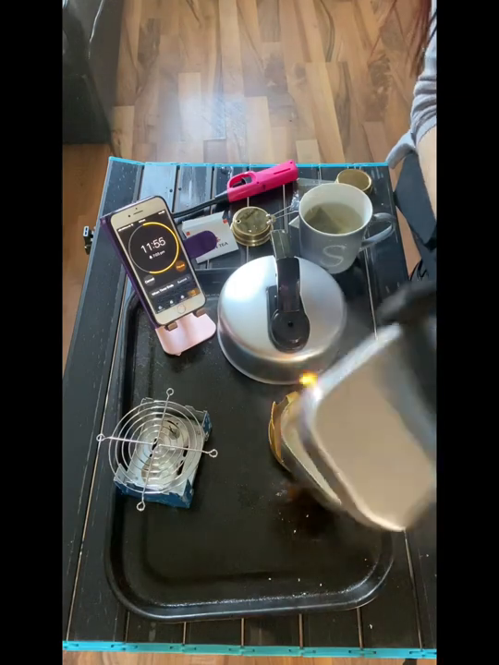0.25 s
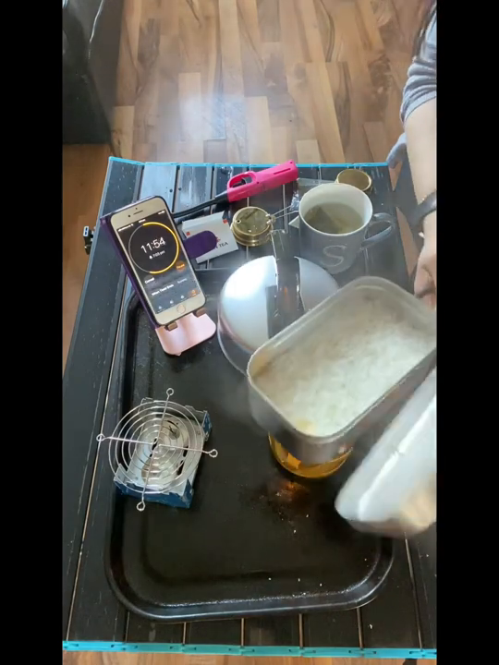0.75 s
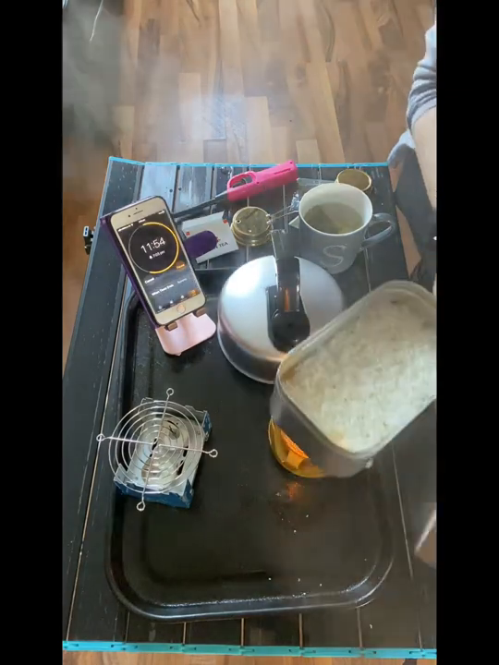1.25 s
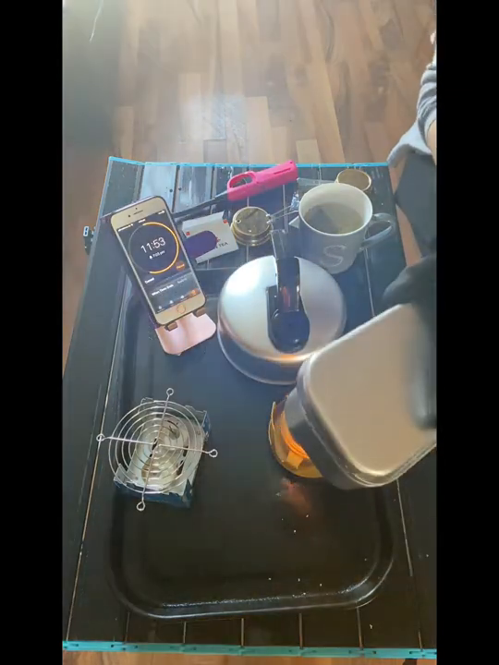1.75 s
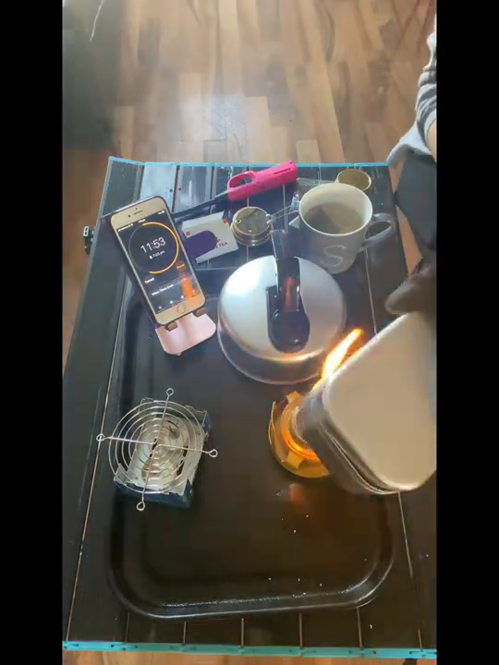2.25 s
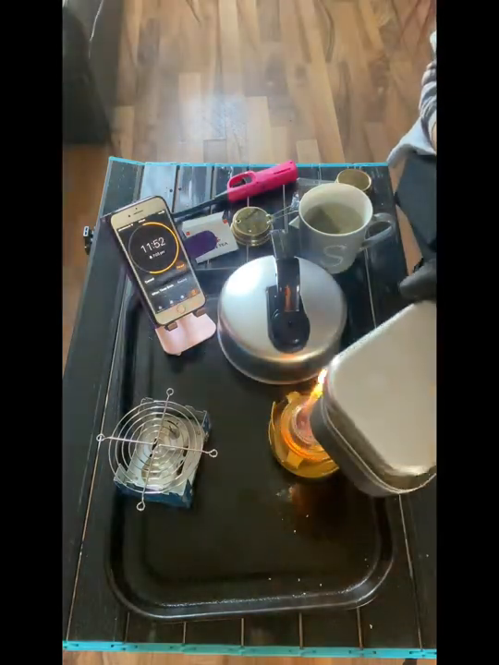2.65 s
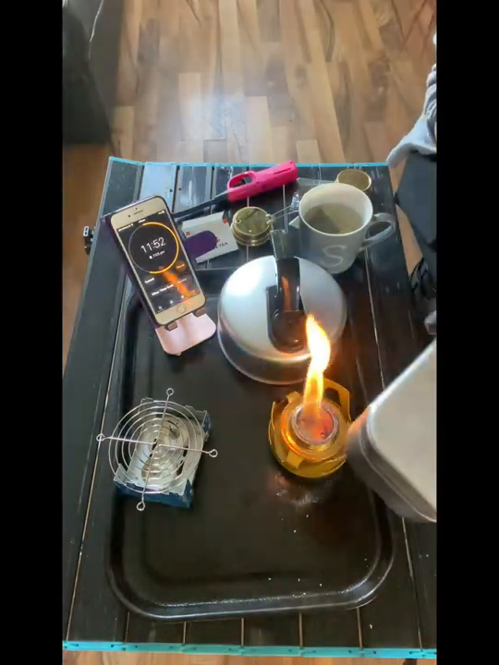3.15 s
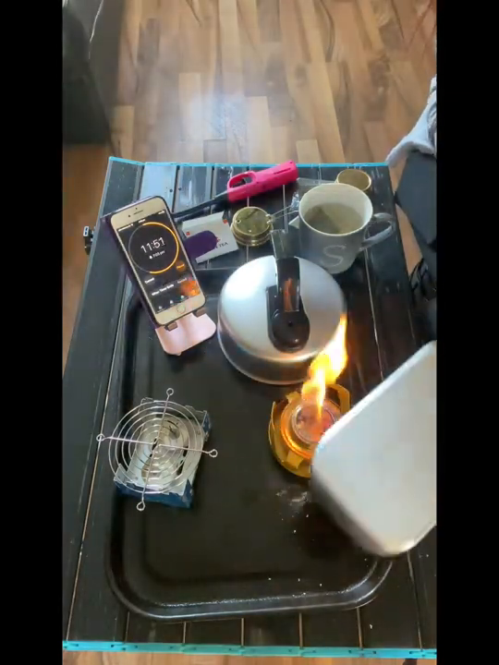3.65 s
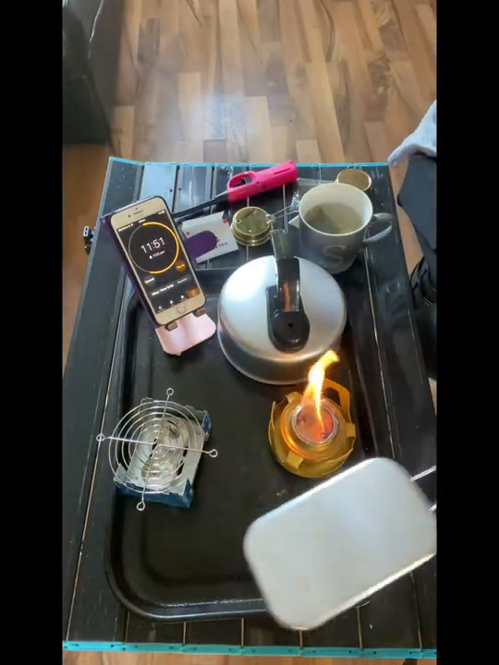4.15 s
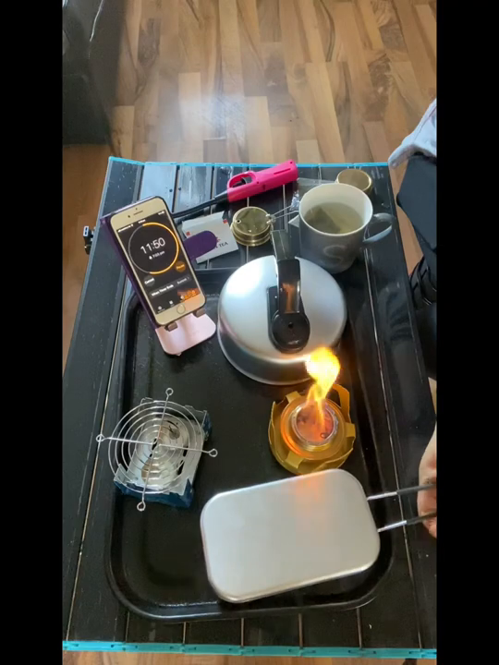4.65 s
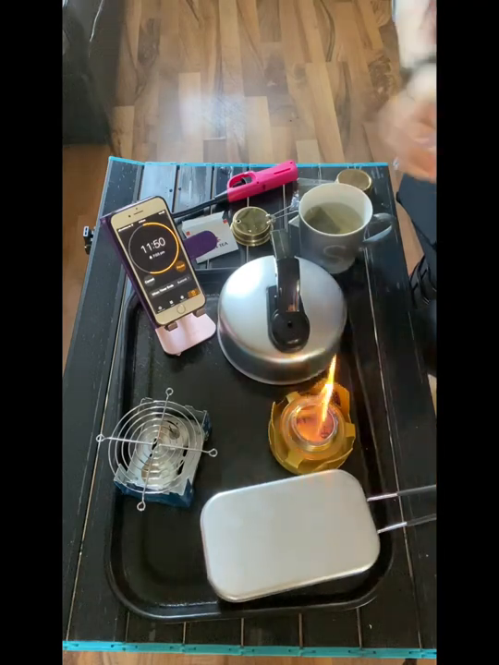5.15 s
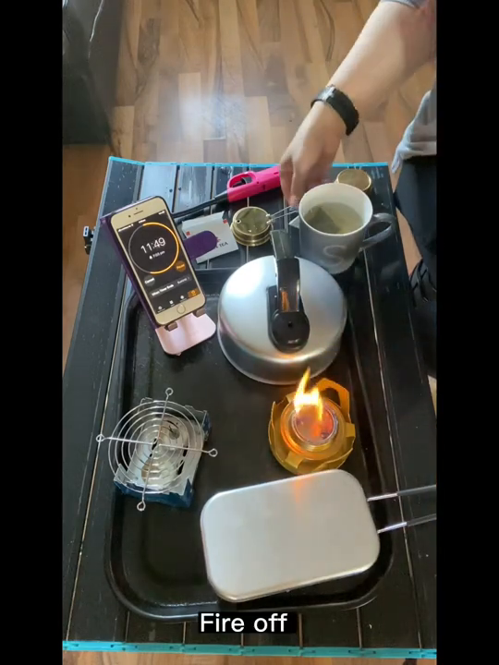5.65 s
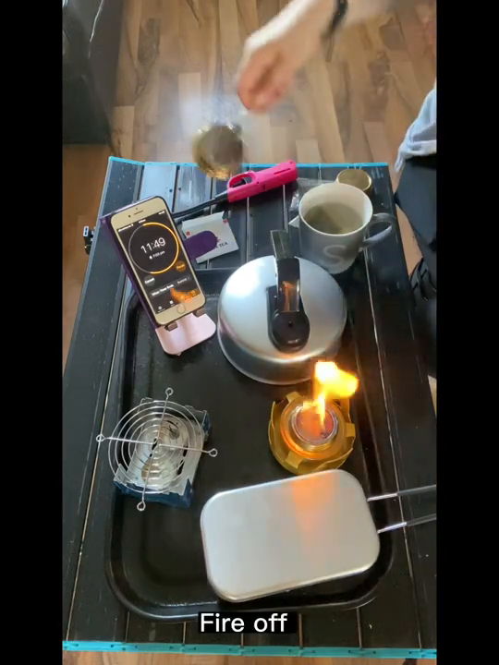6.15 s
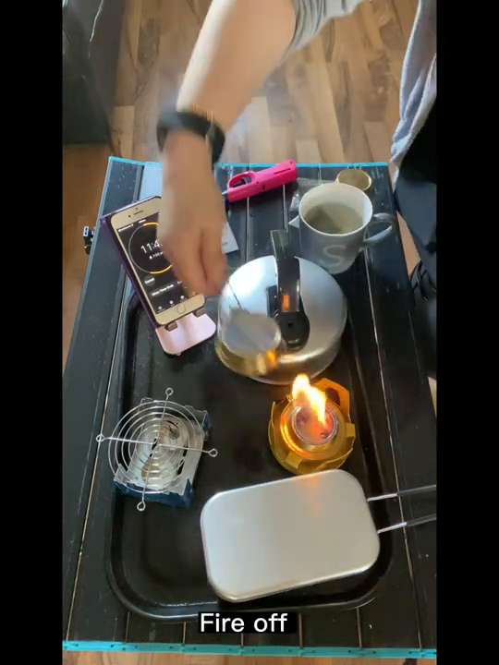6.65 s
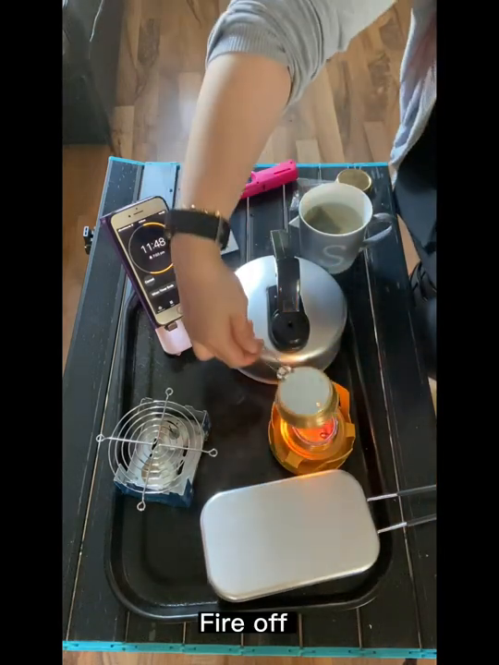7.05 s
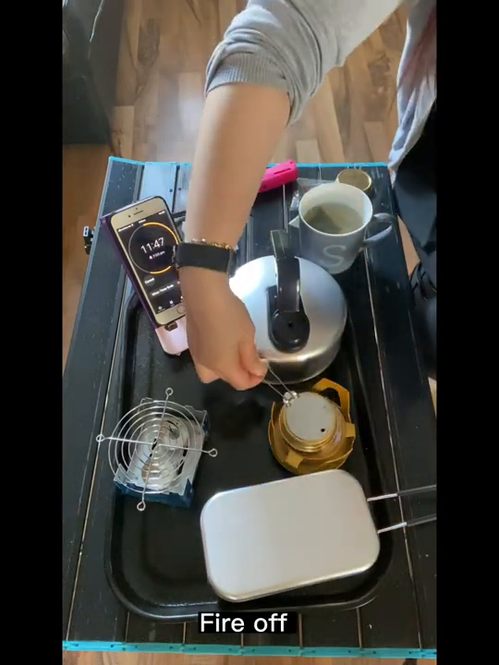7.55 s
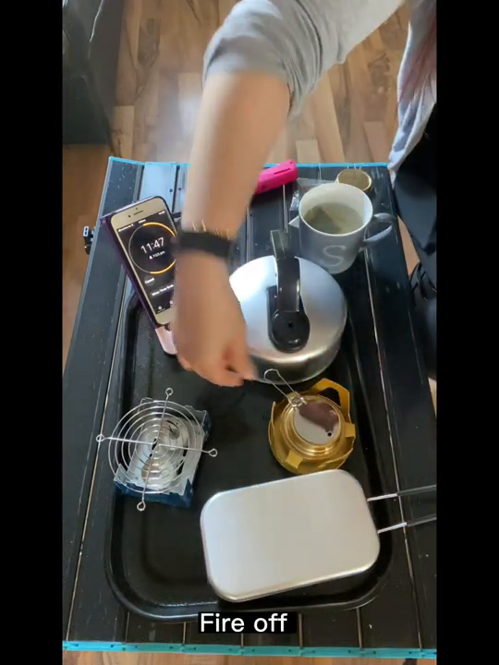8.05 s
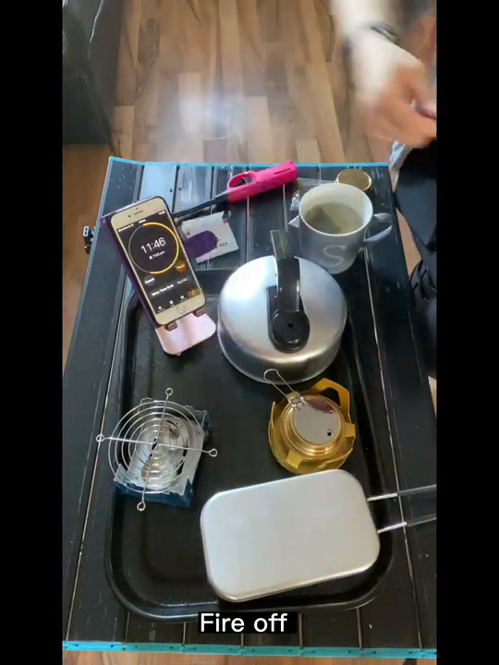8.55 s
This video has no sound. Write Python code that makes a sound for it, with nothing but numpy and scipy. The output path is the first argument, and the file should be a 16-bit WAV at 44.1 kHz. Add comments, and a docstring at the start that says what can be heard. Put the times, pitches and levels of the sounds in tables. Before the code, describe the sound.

A close recording in a small, quiet room with short reflections and faint low room tone. At 0 s a thin lid clicks against a tin over soft, fine simmering and a fading sizzle; a light handle tick follows at 0.2. Around 1.05 a drip flares into a bright hiss and fades. From 1.5 to 2.2 the lid scrapes and catches gently along the rim. At 2.5 it clacks, at 2.75 it snaps sharply, and at 2.95 it gives a last knock. The simmer weakens. The filled tin knocks a steel tray at 4.0, drags briefly, bangs at 4.4 and lands hardest at 4.6, with a thin high wire ring and faint rocking taps to 4.9. Bubbling dies quickly, leaving near-quiet with a tiny tick at 5.9. From 7.5 to 7.95 a small metal cap rattles, scrapes and knocks into place; a short vapour hiss at 8.05 fades to room tone.

```python
"""Mess tin over a spirit burner

An aluminium mess tin is handled in a small, quiet room: drips sizzle as the lid is lifted, the lid scrapes
and snaps back on, the tin knocks down on a steel tray, then a small metal snuffer cap is rattled into place.
Metal contacts are runs of tiny impacts exciting the modes of a body, heard with the room's reflections.
Boiling is a spectrally shaped stream of random pops; the wire handle is a set of decaying sines.
"""
import sys
import numpy as np
from scipy import signal
from scipy.fft import rfft, irfft
from scipy.io import wavfile
from scipy.ndimage import uniform_filter1d

SR = 44100
rng = np.random.default_rng(int(sys.argv[2]) if len(sys.argv) > 2 else 0)


def dump_mix(stems):
    """Bounce the given channels to the path in sys.argv[1] as a 16-bit WAV at rate SR."""
    frames = np.atleast_2d(stems).T  # one column per channel
    limited = np.clip(frames, -1, 1)  # hard clip at full scale
    pcm = np.round(limited * 32767).astype(np.int16)
    wavfile.write(sys.argv[1], SR, pcm)


N = 388080
SIZE = 16384  # samples in the response to one contact
HZ = np.fft.rfftfreq(SIZE, 1 / SR)


def gain_of(db):
    """Decibel law: a level in dB becomes an amplitude ratio."""
    return 10 ** (np.asarray(db) / 20)


def evened(x):
    """Normalization: scales to an rms of one."""
    return x / np.sqrt(np.mean(abs(x) ** 2) + 1e-30)


def read(points, hz):
    """Interpolation of a table along a logarithmic frequency axis."""
    table_hz, value = np.transpose(points)
    return np.interp(np.log(hz + 1), np.log(table_hz + 1), value)


def add(mix, start_s, sound):
    """Superposition: sums a sound into the mix from its start time."""
    part = mix[max(round(start_s * SR), 0):][:len(sound)]
    part += sound[:len(part)]


def coloured(noise, spectrum):
    """Spectral shaping: noise takes on a spectrum, at an rms of one."""
    shape = gain_of(read(spectrum, np.fft.rfftfreq(N, 1 / SR)))
    return evened(irfft(rfft(noise) * shape, N))


# Reverberation time of the room: frequency_hz, t60_s
ROOM_T60 = [(100, .5), (300, .36), (800, .28), (2000, .32), (5000, .33), (9000, .31), (15000, .3)]


def room(x, wet_db, delay_s=0.0032, build_s=0.0041):
    """Reverberation: reflections build up after a short delay and decay at a rate set by frequency."""
    hz, t, tail_bands = signal.stft(rng.choice([-1., 1.], SIZE), SR, nperseg=256)
    decay = gain_of(-60 * t / read(ROOM_T60, hz)[:, None])
    tail = signal.istft(tail_bands * decay, SR, nperseg=256)[1]
    tail *= np.clip((np.arange(len(tail)) / SR - delay_s) / build_s, 0, 1)
    tail /= np.linalg.norm(tail)
    return x + gain_of(wet_db) * signal.oaconvolve(x, tail)[:N]


# Spectrum of the quiet room, relative: frequency_hz, density_db
ROOM_TONE = [(15, -63), (25, -30.5), (59, -8.5), (92, -0.5), (130, -8), (293, -6), (416, -9.5), (489, -8),
             (796, -10), (1020, -11), (1840, -18.5), (2160, -20.5), (5730, -24), (6210, -26), (16000, -38)]
ROOM_TONE_DB = -64


def room_tone():
    """Stationary random noise: the room's steady background has a fixed spectrum and level."""
    return gain_of(ROOM_TONE_DB) * coloured(rng.standard_normal(N), ROOM_TONE)


def boiling(spectrum, level_db, bubbles_per_s, spread_db):
    """Random point process: bubbles burst at random instants, a few large enough to tick."""
    sizes = gain_of(spread_db * np.minimum(rng.exponential(1, N), 5))
    bursting = rng.random(N) < bubbles_per_s / SR
    pops = rng.standard_normal(N) * sizes * bursting
    return coloured(pops, spectrum) * gain_of(level_db)


def burst_level(rows):
    """Exponential growth and decay: the level in dB is the highest of straight rises and falls."""
    t = np.arange(N) / SR
    levels_db = [peak_db - rise * np.maximum(peak_s - t, 0) - fall * np.maximum(t - peak_s, 0)
                 for peak_s, peak_db, rise, fall in rows]
    return np.max(levels_db, axis=0)


# Spectrum of the simmer, relative: frequency_hz, density_db
SIMMER = [(25, -34.5), (100, -12.5), (300, -1), (900, 8.5), (2000, 0.5), (4000, 1.5), (7000, -3.5),
          (11000, -5.5), (13000, -7), (16000, -9.5)]
SIMMER_DB, OFF_FLAME_S, ON_TRAY_S = -62.5, 2.4, 4.6
COOL_DB_PER_S, QUIET_DB_PER_S = 3.5, 15.5  # the second rate adds to the first


def simmer():
    """Boiling noise with cooling: steady over the flame, falling off it, falling faster on the tray."""
    t = np.arange(N) / SR
    cooling_db = COOL_DB_PER_S * np.maximum(t - OFF_FLAME_S, 0)
    quieting_db = QUIET_DB_PER_S * np.maximum(t - ON_TRAY_S, 0)
    return boiling(SIMMER, SIMMER_DB - cooling_db - quieting_db, bubbles_per_s=7800, spread_db=2.5)


# Spectrum of the sizzle, relative: frequency_hz, density_db
SIZZLE = [(500, -31.5), (2800, -17.5), (3700, -14.5), (5000, -19.5), (7000, -5), (7750, 5.5), (8600, -10),
          (9500, -1.5), (11500, -11), (14500, -12.5), (16000, -16.5)]
# Drips of water on the burner: peak_s, level_db, rise_db_per_s, fall_db_per_s
DRIPS = [(0, -64, 40, 45), (1.05, -58, 45, 27), (1.8, -73, 6, 15)]


def sizzle():
    """Flash boiling: each drip swells to a peak of hissing pops and dies away."""
    return boiling(SIZZLE, burst_level(DRIPS), bubbles_per_s=7400, spread_db=2.0)


# Lifts of the lid that lengthen its echo path: centre_s, half_length_s, extra_delay_ms
LID_LIFTS = [(0, 0.32, 0.45), (1.022, 0.38, 0.14), (3.256, 0.34, .25)]
LID_REST_MS = .38


def off_the_lid(hiss, echo_db):
    """Comb-filter interference: the hiss arrives directly and again off the moving lid in the hand."""
    t = np.arange(N) / SR
    delay_ms = LID_REST_MS + sum(extra_ms * np.exp(-((t - centre_s) / half_s) ** 2)
                                 for centre_s, half_s, extra_ms in LID_LIFTS)
    return hiss + gain_of(echo_db) * np.interp(t - delay_ms / 1000, t, hiss)


# Spectrum of the escaping vapour, relative: frequency_hz, density_db
SNUFF_HISS = [(1180, -40), (2000, -15), (2130, -30), (2930, 2), (3680, -10), (5760, -8), (6250, -3),
              (7120, -18), (7790, -1), (8520, -17), (14000, -17)]
# Vapour escaping under the cap: peak_s, level_db, rise_db_per_s, fall_db_per_s
SNUFFS = [(8.06, -66, 60, 22)]


def vapour():
    """Boiling noise under the cap: a dense hiss rises abruptly and decays."""
    return boiling(SNUFF_HISS, burst_level(SNUFFS), bubbles_per_s=11000, spread_db=2.0)


def causal(gain):
    """Minimum phase: the Hilbert transform of the log gain makes all ringing follow the blow."""
    log_gain = np.log(np.maximum(gain, 1e-5))
    circle = np.concatenate([log_gain, log_gain[-2:0:-1]])
    phase = -signal.hilbert(circle).imag[:len(gain)]
    return gain * np.exp(1j * phase)


def chatter(rub_s, t60_s, grit_db, bite_s):
    """Broadband excitation: tiny impacts bite in, last while metal rubs, then die, driving modes evenly."""
    t = np.arange(SIZE // 2) / SR
    envelope = (1 - np.exp(-t / bite_s)) * gain_of(-60 * np.maximum(t - rub_s, 0) / t60_s)
    impacts, catches = rng.standard_normal((2, len(t)))
    grit = gain_of(grit_db * evened(uniform_filter1d(catches, size=60)))
    force = impacts * envelope * grit
    # alternately flatten the spectrum and restore the decay
    for _ in range(3):
        spectrum = rfft(force)
        force = irfft(spectrum / (abs(spectrum) + 1e-12)) * np.sqrt(envelope)
    return evened(rfft(force, SIZE)) * np.linalg.norm(envelope)


def minor_modes(depth_db, from_hz=1800):
    """Modal density: thin sheet has many small peaks and gaps, deepest in the treble."""
    ripple = np.convolve(rng.standard_normal(len(HZ)), signal.windows.hann(61), "same")
    return gain_of(depth_db * np.clip(evened(ripple), -2, 2) * HZ / (HZ + from_hz))


def contacts(rows, body, modes, favour_db, favour_octaves, minor_db, spot_db, grit_db, bite_s,
             bass_hz=450, treble_hz=3000):
    """Modal excitation: weight adds bass, a hard edge treble, and the spot struck favours some modes."""
    ringing = 1 + sum(gain_of(db) ** 2 / (1 + (2 * (HZ - hz) / width) ** 2) for hz, width, db in modes)
    sheet = gain_of(read(body, HZ)) * minor_modes(minor_db)
    low = 1 / (1 + (HZ / bass_hz) ** 4)
    high = 1 - 1 / (1 + (HZ / treble_hz) ** 2)
    octave, out = np.log2(HZ + 1), np.zeros(N)
    for start_s, level_db, rub_s, t60_s, bass_db, treble_db, *spots_hz in rows:
        favoured = sum(1 / (1 + ((octave - np.log2(hz)) / favour_octaves) ** 2) ** 2 for hz in spots_hz)
        # each spot also lies on the nodes of some minor modes and the bellies of others
        spot = minor_modes(spot_db)
        response = sheet * spot * np.sqrt(ringing + gain_of(favour_db) ** 2 * favoured)
        colour = evened(response * gain_of(bass_db * low + treble_db * high))
        sound = irfft(causal(colour) * chatter(rub_s, t60_s, grit_db, bite_s))
        add(out, start_s, gain_of(level_db) * sound)
    return out


LIGHT_TOUCH_DB = -40


def die_away(level_db, damping):
    """Contact damping: the harder the press, the shorter the t60, halving every so many dB."""
    light_t60_s, halving_db = damping
    return light_t60_s * 2 ** ((LIGHT_TOUCH_DB - level_db) / halving_db)


def knocked(rows, damping):
    """Impact: each knock is one contact, with a t60 that follows from its level."""
    return [(start_s, level_db, rub_s, die_away(level_db, damping), *colour)
            for start_s, level_db, rub_s, *colour in rows]


# a catch lasts a moment and has more bass and treble than the slide before it
CATCH_S, CATCH_BASS_DB, CATCH_TREBLE_DB = 0.0058, 6.5, 1


def pushed(rows, damping):
    """Sliding friction and arrest: metal slides along a rim, then catches on a new spot."""
    touches = []
    for start_s, length_s, slide_db, catch_db, bass_db, treble_db, slide_hz, catch_hz, shared_hz in rows:
        catch_bass_db, catch_treble_db = bass_db + CATCH_BASS_DB, treble_db + CATCH_TREBLE_DB
        touches.append((start_s, slide_db, length_s, bass_db, treble_db, slide_hz, shared_hz))
        touches.append((start_s + length_s, catch_db, CATCH_S, catch_bass_db, catch_treble_db,
                        catch_hz, shared_hz))
    return knocked(touches, damping)


# Dense, quickly damped modes of the handle, relative: frequency_hz, gain_db
HANDLE_BODY = [(40, -6), (300, 6.5), (1200, 8), (2500, 6), (5000, 3), (9000, -3.5), (16000, -15)]
# Light ticks and brushes of handle and hand: start_s, level_db, contact_s, bass_db, treble_db, favoured_hz
HANDLE_KNOCKS = [ (0.235, -37.5, 0.0011, -4, 13, 6900), (0.336, -50.5, .001, -10, 8, 4200),
                 (0.786, -53.5, 0.0077, 22, 3, 262), (3.310, -60, 0.042, -14, 8, 5330),
                 (3.432, -55, 0.0018, 12, 6, 4570), (3.497, -54, 0.0038, -4, -29, 1010),
                 (7.103, -60, 0.0035, 10, -30, 560)]
HANDLE_DAMPING = (0.012, 5.1)  # light_t60_s, halving_db


def handle():
    """Heavily damped impact: the handle and the hand holding it tick and brush without main modes."""
    return contacts(knocked(HANDLE_KNOCKS, HANDLE_DAMPING), HANDLE_BODY, [], favour_db=5,
                    favour_octaves=.3, minor_db=1.5, spot_db=1, grit_db=3, bite_s=.0002)


# Wire handle singing on after the tin lands: start_s, pitch_hz, level_db, t60_s
WIRE_RING = [(4.576, 11450, -54, .5), (4.576, 12680, -59, 1.15), (4.576, 14870, -56, .6)]


def wire():
    """Free vibration: lightly damped modes of the wire handle ring as decaying sines."""
    t, out = np.arange(SR) / SR, np.zeros(N)
    for start_s, pitch_hz, level_db, t60_s in WIRE_RING:
        decay = gain_of(level_db - 60 * t / t60_s)
        add(out, start_s, decay * np.sin(2 * np.pi * pitch_hz * t))
    return out


# Main modes of the snuffer cap: frequency_hz, width_hz, above_body_db
CAP_MODES = [(170, 25, 8), (220, 30, 8), (362, 24, 9), (570, 22, 12), (625, 35, 7), (1180, 40, 7),
             (1328, 18, 12), (1462, 20, 10), (1655, 40, 10), (2340, 45, 14), (2748, 22, 11), (2960, 30, 9),
             (3260, 50, 6), (3680, 70, 6), (4470, 45, 7), (5540, 60, 11), (6260, 50, 7), (7780, 90, 7),
             (9040, 50, 8)]
# Its dense, quickly damped modes, relative: frequency_hz, gain_db
CAP_BODY = [(40, -32), (130, -11), (220, -4), (420, -5.5), (560, 0.5), (850, -6), (1500, -1.5), (1980, -12),
            (2600, -2), (4000, -4.5), (8000, -5), (10500, -11.5), (14000, -12.5), (16000, -21)]
# Pushes home: start_s, length_s, slide_db, catch_db, bass_db, treble_db, slide_hz, catch_hz, shared_hz
CAP_PUSHES = [(7.684, .021, -35.5, -28.5, -3, -0.5, 3150, 1360, 2310),
              (7.765, 0.027, -39.5, -60, -10, -30, 583, 1300, 600)]
# Lifted from the table, then seated on the burner:
# start_s, level_db, contact_s, bass_db, treble_db, two favoured_hz
CAP_KNOCKS = [ (5.885, -52, .005, 7, -1, 555, 1650), (7.526, -34.5, .0097, -27, -1.5, 3612, 2940),
              (7.561, -38, 0.0026, 6, -1.5, 1490, 3770), (7.822, -43, 0.0039, -10, -22, 1290, 620),
              (7.858, -27, 0.0042, -2, -11.5, 970, 527), (7.885, -39, 0.01, 3, -19, 507, 1110),
              (7.929, -31, 0.0022, -3, -17, 634, 372)]
CAP_DAMPING = (.1, 18.6)  # light_t60_s, halving_db


def cap():
    """Modal ringing of a small shell: the snuffer cap knocks and slides into place."""
    touches = pushed(CAP_PUSHES, CAP_DAMPING) + knocked(CAP_KNOCKS, CAP_DAMPING)
    return contacts(touches, CAP_BODY, CAP_MODES, favour_db=11, favour_octaves=.08,
                    minor_db=2.5, spot_db=4.5, grit_db=3, bite_s=.0004)


# Dull taps as the tin rocks after a landing: start_s, level_db
ROCKS = [(4.455, -33), (4.622, -49), (4.759, -46), (4.905, -50)]
TRAY_DAMPING = (0.096, 46)  # light_t60_s, halving_db
ROCK_S, ROCK_BASS_DB, ROCK_TREBLE_DB, ROCK_HZ = 0.0017, 3, -20, (560, 460, 700)


def rocked():
    """Repeated impact: the rocking tin taps back on the same spot each time."""
    taps = [(start_s, level_db, ROCK_S, ROCK_BASS_DB, ROCK_TREBLE_DB, *ROCK_HZ)
            for start_s, level_db in ROCKS]
    return knocked(taps, TRAY_DAMPING)


# Tin dragged over the tray between landings: time_s, pressure_db (before the DRAG_DB offset)
DRAG = [(4.135, -34.5), (4.193, -36.5), (4.203, -43), (4.287, -41), (4.325, -37)]
DRAG_DB, DRAG_BASS_DB, DRAG_TREBLE_DB, DRAG_HZ = -3, -4.5, -18, (1220, 1620, 850)
SLIP_S = .025


def dragged(t60_s):
    """Sliding friction: an unbroken run of slips, as loud as the tin is pressed down."""
    times_s, pressure_db = np.transpose(DRAG)
    slips = []
    for start_s in np.arange(times_s[0], times_s[-1], SLIP_S):
        level_db = DRAG_DB + np.interp(start_s + SLIP_S / 2, times_s, pressure_db)
        slips.append((start_s, level_db, SLIP_S, t60_s, DRAG_BASS_DB, DRAG_TREBLE_DB, *DRAG_HZ))
    return slips


# Main modes of tin and tray: frequency_hz, width_hz, above_body_db
TRAY_MODES = [(120, 20, 2), (222, 28, 5), (275, 25, 4), (360, 18, 9), (538, 25, 7), (715, 35, 5),
              (932, 20, 7), (995, 20, 7), (1072, 18, 8), (1415, 30, 7), (1510, 20, 5), (1665, 20, 5),
              (1940, 25, 4), (2640, 40, 2), (3080, 80, 3), (3646, 30, 7), (4260, 60, 7), (4620, 60, 2),
              (11000, 160, 4)]
# Their dense, quickly damped modes, relative: frequency_hz, gain_db
TRAY_BODY = [(35, -29.5), (80, -15), (160, -8), (300, -4.5), (450, -3), (620, -3), (800, -5), (1200, -4),
             (1500, -3.5), (2300, -4), (3300, -7), (5500, -11), (8000, -15), (11000, -24.5), (16000, -24)]
# The filled tin lands on one corner, the next, then flat with both edges:
# start_s, level_db, contact_s, bass_db, treble_db, three favoured_hz
TRAY_KNOCKS = [ (4.003, -22.5, 0.0062, -2, -5.5, 1078, 1450, 299),
               (4.111, -32.5, 0.012, -4, -11.5, 1250, 1620, 1110),
               (4.367, -13, 0.0053, -1.5, 4, 543.4, 600, 1023),
               (4.576, -9, 0.0013, 1.5, 7.5, 1420, 712, 4560), (4.586, -17, 0.0018, 6, -7, 720, 653.4, 844)]


def tray():
    """Modal ringing of a plate: the filled tin knocks, rocks and drags on the steel tray."""
    touches = knocked(TRAY_KNOCKS, TRAY_DAMPING) + rocked() + dragged(t60_s=.06)
    return contacts(touches, TRAY_BODY, TRAY_MODES, favour_db=8.5, favour_octaves=.1,
                    minor_db=2.5, spot_db=2.5, grit_db=4.0, bite_s=0.00029)


# Main modes of the lid: frequency_hz, width_hz, above_body_db
LID_MODES = [(330, 25, 5), (425, 50, 4), (790, 20, 5), (875, 30, 7), (1010, 20, 5), (1140, 18, 8),
             (1515, 35, 7), (1605, 25, 8), (1925, 16, 14), (2385, 26, 11), (2650, 40, 5), (2850, 45, 5),
             (2950, 45, 6), (3080, 30, 3), (3530, 20, 6), (4160, 25, 10), (4780, 40, 7), (4995, 32, 12),
             (5810, 25, 8), (6430, 30, 8), (7350, 50, 8)]
# Its dense, quickly damped modes, relative: frequency_hz, gain_db
LID_BODY = [(40, -30), (150, -19.5), (260, -9.5), (520, -5), (700, -1.5), (1050, -1), (1300, -6.5),
            (1650, -4), (2150, -9), (2800, -4.5), (3600, -10), (6500, -16.5), (9000, -26.5), (16000, -31.5)]
# Pushes along the rim: start_s, length_s, slide_db, catch_db, bass_db, treble_db,
# slide_hz, catch_hz, shared_hz
LID_PUSHES = [ (1.537, 0.086, -40, -59, 4, -3.5, 870, 2420, 1090),
              (1.757, 0.096, -36.5, -30, 0, -8.5, 2500, 1090, 872),
              (1.870, 0.02, -38.5, -34, -3, -6.5, 1060, 426, 820),
              (1.984, .015, -37, -34.5, -11, -11, 2600, 750, 980),
              (2.137, 0.011, -46.5, -57, 3, -3, 1130, 1110, 670),
              (2.192, 0.042, -47.5, -37.5, -2, -24, 1600, 387, 700),
              (2.530, 0.0087, -25.5, -23.5, -2.5, -0.5, 1130, 1930, 1600),
              (2.628, .025, -46.5, -39.5, -1.5, -6, 1100, 1470, 1896),
              (2.729, 0.015, -20.5, -12.5, -5, 4.5, 2800, 2000, 1540),
              (2.958, 0.021, -30, -20.5, -7.5, -11, 890, 568, 745)]
# Lid against the rim of the tin: start_s, level_db, contact_s, bass_db, treble_db, two favoured_hz
LID_KNOCKS = [ (0.001, -36, .003, 11, 2, 293, 454), (0.019, -29.5, .004, 18.5, 15.5, 2410, 4880),
              (2.567, -34.5, .005, -11, -10.5, 677, 1920), (2.921, -43.5, .004, -4, -45, 787, 1580)]
LID_DAMPING = (0.13, 11)  # light_t60_s, halving_db


def lid():
    """Modal ringing of thin sheet: the lid scrapes along the rim, catches and knocks."""
    touches = pushed(LID_PUSHES, LID_DAMPING) + knocked(LID_KNOCKS, LID_DAMPING)
    return contacts(touches, LID_BODY, LID_MODES, favour_db=12.5, favour_octaves=0.083,
                    minor_db=3.0, spot_db=6.5, grit_db=3.5, bite_s=0.00051)


def scene():
    """Superposition: the cookware in the room, over the boiling and the room tone."""
    background = room_tone()
    hiss = off_the_lid(simmer() + sizzle(), echo_db=-11.5) + vapour()
    handling = room(handle(), wet_db=-10) + wire()
    knocks = room(cap(), wet_db=-4.5) + room(tray(), wet_db=-4.5) + room(lid(), wet_db=-12.5)
    return (background + hiss + handling + knocks)[None]


EDGE_HZ = 16150


def record(dry):
    """Saturation and band limiting: the microphone rounds off high peaks, then a low-pass follows."""
    ceiling = .9
    rounded = ceiling * np.tanh(dry / ceiling)
    low_pass = signal.firwin(401, EDGE_HZ, window=("kaiser", 9), fs=SR)
    return signal.oaconvolve(rounded, low_pass[None], "same")


dry = scene()
out = record(dry)
dump_mix(out)
```